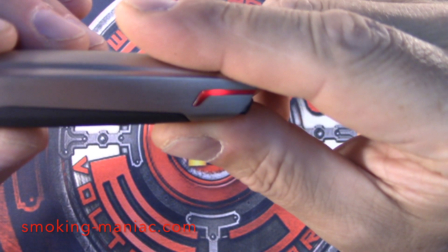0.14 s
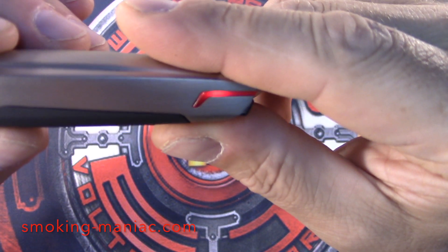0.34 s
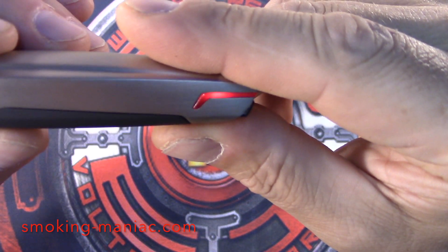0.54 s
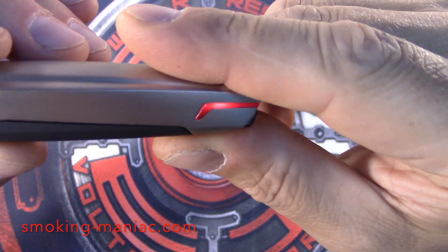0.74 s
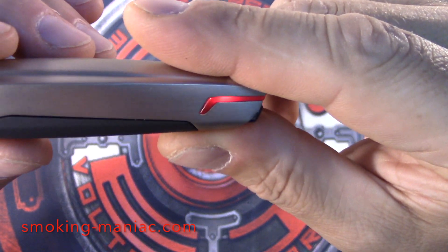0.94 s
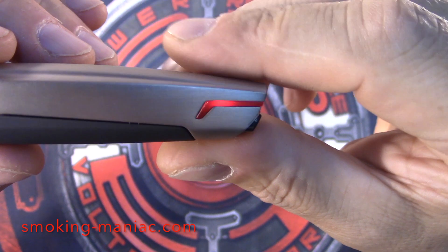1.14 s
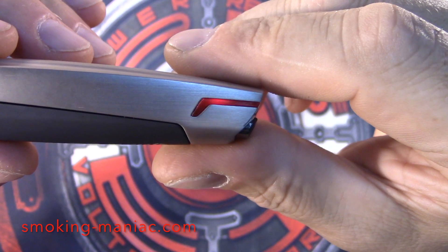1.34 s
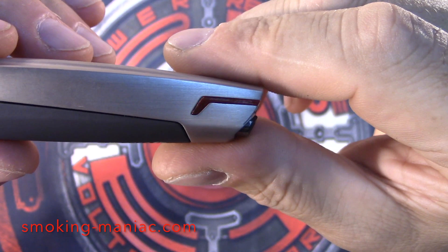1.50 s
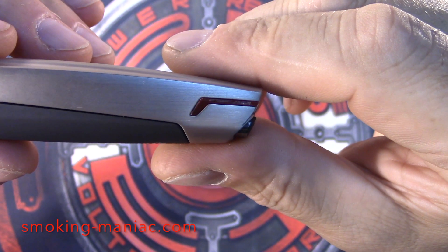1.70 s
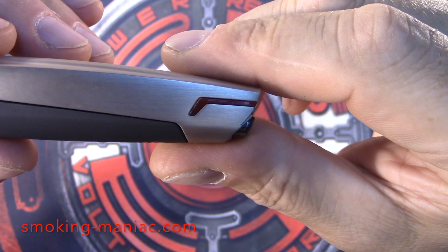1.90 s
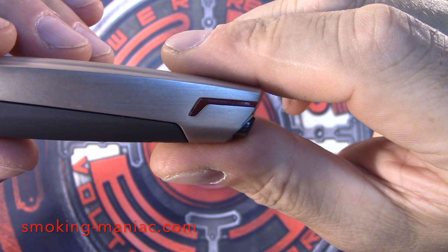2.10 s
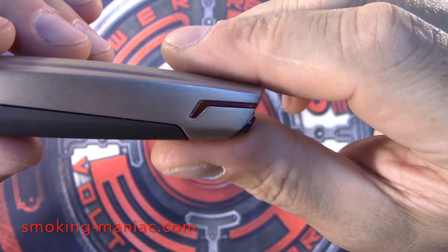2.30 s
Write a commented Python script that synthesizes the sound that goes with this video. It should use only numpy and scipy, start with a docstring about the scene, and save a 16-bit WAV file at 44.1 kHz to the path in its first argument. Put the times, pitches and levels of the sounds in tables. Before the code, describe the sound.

Close by, a small plastic device clatters with quick, uneven clicks and light scraping as fingers push a part until it knocks to a stop. Then come a few tiny ticks and the low hum of a quiet room.

```python
"""Stick-slip in a small plastic device

Fingers slide a stiff part in its shell for half a second. It sticks and slips, and each release excites
the shell's resonances: a rattle of clicks over a fine rasp, ending in a dull knock at the stop.
A few tiny handling ticks follow. The quiet room holds a low hum and two far ticks a second apart,
like a clock."""
import sys
import numpy as np
from scipy import signal
from scipy.fft import rfft, irfft, next_fast_len
from scipy.io import wavfile
from scipy.ndimage import map_coordinates

SR = 44100
rng = np.random.default_rng(int(sys.argv[2]) if len(sys.argv) > 2 else 0)


def master(y):
    """Save y as 16-bit WAV."""
    cut = np.clip(np.atleast_2d(y).T, -1, 1)
    pcm = np.round(cut * 32767)  # scale
    wavfile.write(sys.argv[1], SR, pcm.astype(np.int16))


N = 103635

# clicks of the sliding part (time [s], level [dB], treble shelf [dB], crispness shelf [dB])
CLICKS = [(0.2013, -25, -2.5, 7), (.2487, -16, -13, 16), (0.2527, -6, -0.5, 4.5), (.2651, -20, -23, 8),
          (0.2674, -22, 8, -7), (0.2779, -6, -0.5, 2.5), (.3025, -31.5, 6, -6), (.317, -22.5, -2.5, 7),
          (0.3581, -16.5, 1.5, 2), (0.365, -16.5, -13.5, 15), (.3768, -20.5, 3.5, -4), (0.4081, -23, 5, 0),
          (0.4093, -23.5, 0, -8), (0.4267, -12.5, -2, -5), (.4298, 0.7, -0.5, 0.5), (0.4574, -20.5, -7, 1),
          (.4749, -23, -2, 7), (0.497, -22.5, 0, 0), (0.5214, -20.5, -2, 6), (0.5275, -22, -1, -7),
          (0.5441, -21.5, -1, -2), (0.5723, -8, -4.5, -2), (0.6024, -12, -4.5, 6), (.6068, -24, -14, 5),
          (0.6144, -18.5, -7, 8), (.6505, -25.5, 6, -8), (.6993, -7.5, 0, -12), (0.7062, -22, -6, 7)]
# spectral envelope of a click (frequency [Hz], level [dB])
SHELL_COLOUR = [(60, -31), (300, -22.5), (700, -12), (1400, -11), (2450, -2), (3100, -9.5), (4150, -23.5),
                (5100, -24), (6600, -19), (7650, -10.5), (8700, -18), (9600, -24), (12300, -28.5),
                (13800, -43), (16000, -49), (20000, -100)]
# resonances of the shell and the gaps between them (frequency [Hz], bandwidth [Hz], gain [dB])
SHELL_MODES = [(1090, 160, -4), (1380, 180, 6), (1930, 110, 4), (2130, 90, -9), (2300, 150, 2.5),
               (2685, 60, 4), (3015, 50, 4), (4620, 280, 10), (5900, 400, 3), (6860, 110, 7),
               (7335, 90, 6.5), (7800, 170, 8), (10430, 300, 4), (11650, 300, 4), (12350, 300, 4)]
# two contact resonances, moving as the part catches at different places (time [s], lower [Hz], upper [Hz])
CONTACT_PATH = [(.25, 2720, 7700), (.28, 2730, 7740), (.43, 1420, 6150), (.50, 2400, 7500),
                (.573, 2870, 7700), (.70, 1690, 8360)]
# shape of the lower and upper contact resonance (half-width [octaves], gain [dB])
CONTACT_SHAPE = [(0.8, 5), (0.55, 6.5)]
# strength of the fine slips between the clicks (time [s], level [dB])
SLIP_STRENGTH = [(.16, -52), (.235, -58), (.25, -40), (.30, -39), (.345, -36.5), (.42, -38), (.46, -34),
                 (.56, -33.5), (.64, -33), (0.692, -31.5), (.71, -62)]
# dull knocks (time [s], level [dB], frequency [Hz], T60 [s])
KNOCKS = [(0.0505, -32.5, 915, 0.002), (.075, -41.5, 320, 0.024), (.194, -36.5, 824, 0.0014),
          (0.6497, -22.5, 2410, 0.013), (0.7112, -11, 1340, 0.0028), (0.7113, -15, 2450, 0.004),
          (1.3143, -37, 1660, 0.021), (1.3142, -43.5, 3780, 0.0054)]
# dry ticks under the fingers (time [s], level [dB], treble shelf [dB], crispness shelf [dB])
HANDLING_TICKS = [(0.735, -35, 4, -22), (0.9358, -34.5, -24.5, 14), (1.024, -39, -3, -2),
                  (1.072, -41.5, 12, -3), (1.323, -37, 5, -13)]
# spectral envelope of a handling tick (frequency [Hz], level [dB])
TICK_COLOUR = [(300, -10), (1500, -11.5), (2800, 4), (5200, 1), (7500, -14), (11000, -3), (16000, -23)]
# reverberation time of the room (frequency [Hz], T60 [s])
ROOM_DECAY = [(200, 0.26), (1500, 0.091), (2600, 0.17), (8000, 0.17), (14000, 0.11)]
# far ticks (time [s], level [dB])
CLOCK_TICKS = [(.799, -47.5), (1.802, -52)]
# spectral envelope of a far tick (frequency [Hz], level [dB])
CLOCK_COLOUR = [(300, -12), (1500, -2), (2000, -12), (2700, 1), (3600, -16.5), (4550, -4), (5400, -21),
                (6250, -11.5), (7000, -20), (9000, -23), (14000, -46.5)]
# spectral envelope of the room air (frequency [Hz], level [dB])
AIR_COLOUR = [(25, -36.5), (60, -16.5), (130, -18), (200, -2), (310, -4), (410, -9.5), (600, -8.5),
              (1000, -12), (1600, -15), (2600, -20.5), (4000, -25.5), (7000, -31.5), (11300, -39),
              (15500, -46)]
# partials of the hum (frequency [Hz], rms level [dB])
HUM_PARTIALS = [(221, -69.5), (615, -66.5)]

PULSE_SAMPLES = 4096
TREBLE_HZ, CRISP_HZ, TOP_HZ = 4310, 10000, 15800
SLIP_NOMINAL_PER_S, SLIP_SPREAD_DB, SLIP_SCATTER_DB = 850, 2, -2
SLIP_TREBLE_DB, SLIP_TREBLE_RANGE_DB, SLIP_CRISP_DB = -4.5, 8.5, 1.5
SLIP_LOWER_HZ, SLIP_UPPER_HZ = 2380, 7850  # contact resonances
KNOCK_LOW_CUT_HZ, KNOCK_HIGH_CUT_HZ, KNOCK_ATTACK_S, KNOCK_SCATTER_DB = 433, 3600, 0.00039, -10
SCATTER_DB, SCATTER_DELAY_S, SCATTER_T60_S = -7.5, 0.0015, 0.016
ROOM_DB, ROOM_DELAY_S = -16.5, 0.0031
CLOCK_T60_S, CLOCK_ATTACK_S = 0.27, 0.0013
AIR_DB, HUM_WANDER_RAD, HUM_WAVER_DB = -53, 0.58, -4


def rattle():
    """Stick-slip friction: each release is a click, its resonances set by where the part catches."""
    out = np.zeros(N)
    when, *resonances = np.transpose(CONTACT_PATH)
    for s, db, treble_db, crisp_db in CLICKS:
        contact_hz = [np.interp(s, when, hz) for hz in resonances]
        click = snap(SHELL_COLOUR, treble_db, crisp_db, SHELL_MODES, contact_hz)
        add(out, s, amp(db) * scattered(click, SCATTER_DB))
    return out


def rasp(contacts=6):
    """Micro-slip: contact points of differing hardness drive the shell with irregular impulse trains."""
    out = np.zeros(N)
    when, strength_db = np.transpose(SLIP_STRENGTH)
    for hardness in np.linspace(-1, 1, contacts):
        gap_draw, size_draw = rng.standard_normal((200, 2)).T
        times = when[0] + np.cumsum(np.exp(.5 * gap_draw)) * contacts / SLIP_NOMINAL_PER_S
        sizes = amp(np.interp(times, when, strength_db) + SLIP_SPREAD_DB * size_draw)
        sliding = times < when[-1]
        slips = np.zeros(N)
        slips[(times[sliding] * SR).astype(int)] = sizes[sliding]
        treble_db = SLIP_TREBLE_DB + SLIP_TREBLE_RANGE_DB * hardness
        click = snap(SHELL_COLOUR, treble_db, SLIP_CRISP_DB, SHELL_MODES, (SLIP_LOWER_HZ, SLIP_UPPER_HZ))
        out += signal.fftconvolve(slips, scattered(click, SLIP_SCATTER_DB))[:N]
    return out


def knocks():
    """Damped oscillation: soft contacts ring briefly, and the small shell radiates little bass."""
    out, t = np.zeros(N), np.arange(PULSE_SAMPLES) / SR
    band = signal.butter(4, [KNOCK_LOW_CUT_HZ, KNOCK_HIGH_CUT_HZ], 'bandpass', fs=SR, output='sos')
    for s, db, hz, t60 in KNOCKS:
        envelope = amp(-60 * t / t60) * (1 - np.exp(-t / KNOCK_ATTACK_S))
        ring = signal.sosfilt(band, envelope * np.sin(2 * np.pi * hz * t))
        add(out, s, amp(db) * scattered(ring / np.abs(ring).max(), KNOCK_SCATTER_DB))
    return out


def handling_ticks():
    """Impulsive excitation: the case ticks faintly as the grip shifts."""
    out = np.zeros(N)
    for s, db, treble_db, crisp_db in HANDLING_TICKS:
        add(out, s, amp(db) * scattered(snap(TICK_COLOUR, treble_db, crisp_db), SCATTER_DB))
    return out


def snap(colour, treble_db, crisp_db, modes=(), contact_hz=()):
    """Minimum-phase impulse response, peak 1: energy arrives at once, then rings in any resonances."""
    hz = np.fft.rfftfreq(PULSE_SAMPLES, 1 / SR)
    modes_db = sum(db / (1 + (2 * (hz - centre) / width) ** 2) for centre, width, db in modes)
    contact_db = sum(db * np.exp(-(np.log2((hz + 1) / centre) / octaves) ** 2)
                     for centre, (octaves, db) in zip(contact_hz, CONTACT_SHAPE))
    spectrum_db = along(colour, hz) + modes_db + contact_db + brightness(hz, treble_db, crisp_db)
    cepstrum = irfft(np.log(amp(spectrum_db)))
    cepstrum[1:PULSE_SAMPLES // 2] *= 2  # folding onto positive time makes the pulse causal
    cepstrum[PULSE_SAMPLES // 2 + 1:] = 0
    pulse = irfft(np.exp(rfft(cepstrum)))
    return pulse / np.abs(pulse).max()


def brightness(hz, treble_db, crisp_db):
    """Contact hardness as two treble shelves in dB: the harder the contact, the brighter the click."""
    treble, crisp = (hz / TREBLE_HZ) ** 4, (hz / CRISP_HZ) ** 20
    return treble_db * treble / (1 + treble) + crisp_db * crisp / (1 + crisp)


def scattered(x, level_db):
    """Early reflection: hands and table return dense echoes just after the direct sound."""
    t = np.arange(PULSE_SAMPLES) / SR - SCATTER_DELAY_S
    echo = rng.standard_normal(PULSE_SAMPLES) * amp(-60 * np.abs(t) / SCATTER_T60_S) * (t > 0)
    return x + amp(level_db) * signal.fftconvolve(x, echo / np.linalg.norm(echo))[:len(x)]


def room(x):
    """Reverberation: a small room's diffuse tail decays exponentially, each band at its own rate."""
    hz, t, bands = signal.stft(rng.standard_normal(SR // 2), SR, nperseg=256)
    decay = amp(-60 * t / along(ROOM_DECAY, hz)[:, None])
    _, tail = signal.istft(bands * decay, SR, nperseg=256)
    tail = np.pad(tail, (int(ROOM_DELAY_S * SR), 0))
    return signal.fftconvolve(x, tail / np.linalg.norm(tail))[:N]


def clock():
    """Diffuse field: far ticks arrive as room sound, each a burst of decaying noise."""
    out, t = np.zeros(N), np.arange(SR // 2) / SR
    for s, db in CLOCK_TICKS:
        envelope = amp(db - 60 * t / CLOCK_T60_S) * (1 - np.exp(-t / CLOCK_ATTACK_S))
        add(out, s, envelope * noise(CLOCK_COLOUR, len(t)))
    return out


def hum(drifts_per_s=12):
    """Random modulation: low tones waver slowly in amplitude and phase."""
    out, t = np.zeros(N), np.arange(N) / SR
    drift = lambda: map_coordinates(rng.standard_normal(128), [t * drifts_per_s])
    for hz, db in HUM_PARTIALS:
        waver = amp(HUM_WAVER_DB * drift())
        phase = 2 * np.pi * hz * t + HUM_WANDER_RAD * drift()
        out += amp(db) * unit(waver * np.sin(phase))
    return out


def air():
    """Stationary noise: the room's steady floor, strongest at low frequencies."""
    return amp(AIR_DB) * noise(AIR_COLOUR, N)


def noise(colour, size):
    """Spectral shaping: white noise takes on a colour, at rms 1."""
    return unit(filtered(rng.standard_normal(size), lambda hz: amp(along(colour, hz))))


def filtered(x, response):
    """Linear filtering: the spectrum is multiplied by a frequency response."""
    size = next_fast_len(len(x) + 2 * PULSE_SAMPLES)
    return irfft(rfft(x, size) * response(np.fft.rfftfreq(size, 1 / SR)), size)[:len(x)]


def along(points, hz):
    """Interpolation of (frequency, value) points on a logarithmic frequency axis."""
    frequencies, values = np.transpose(points)
    return np.interp(np.log(hz + 1), np.log(frequencies + 1), values)


def amp(db):
    """Amplitude ratio of a level in decibels."""
    return 10 ** (np.asarray(db) / 20)


def unit(x):
    """Normalisation to rms 1."""
    return x / np.sqrt(np.mean(x ** 2) + 1e-20)


def add(track, s, sound):
    """Superposition of a sound on the track, starting at s seconds."""
    start = int(round(s * SR))
    track[start:start + len(sound)] += sound[:N - start]


def scene():
    """Superposition: the near device, its reverberation and the background sum in one channel."""
    device = rattle() + rasp() + knocks() + handling_ticks()
    return (device + amp(ROOM_DB) * room(device) + clock() + hum() + air())[None]


def record(dry):
    """Band limiting: an ideal low-pass filter removes everything above TOP_HZ."""
    return np.array([filtered(x, lambda hz: hz < TOP_HZ) for x in dry])


dry = scene()
out = record(dry)
master(out)
```